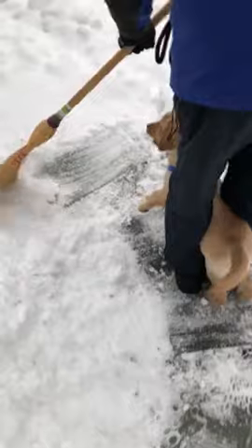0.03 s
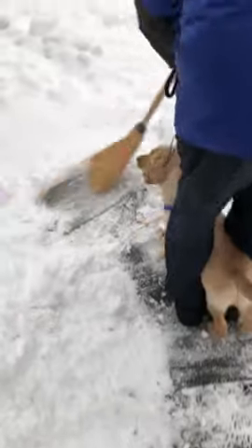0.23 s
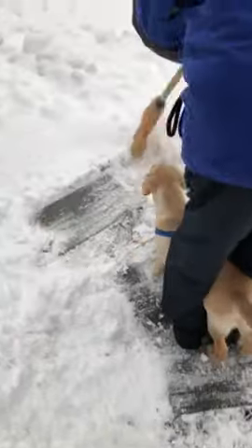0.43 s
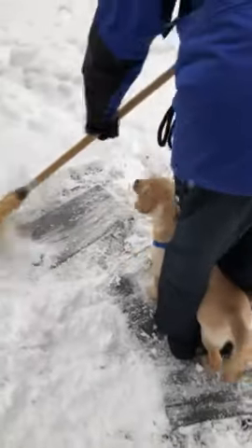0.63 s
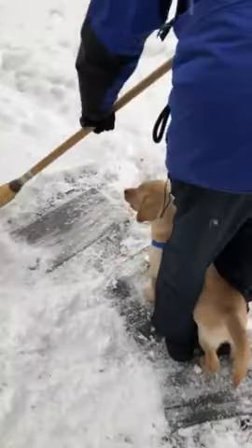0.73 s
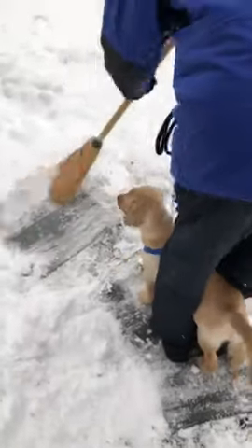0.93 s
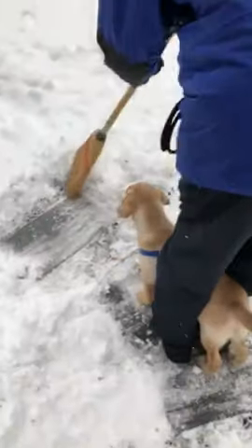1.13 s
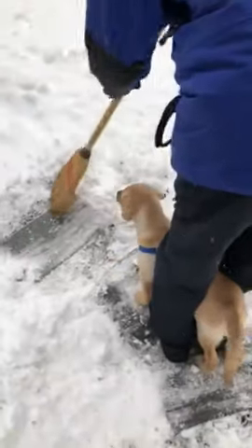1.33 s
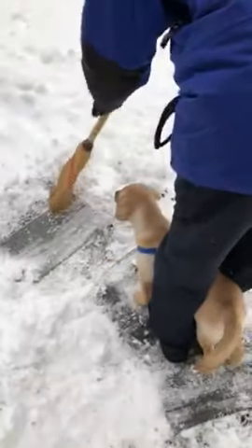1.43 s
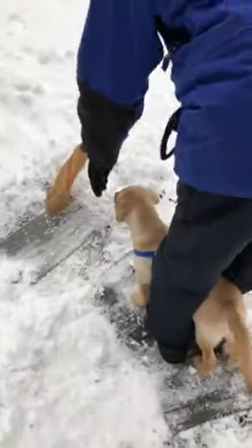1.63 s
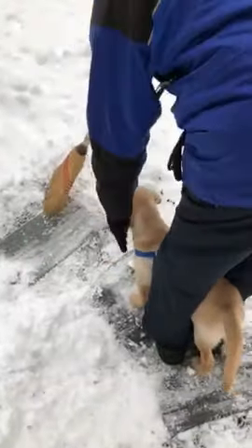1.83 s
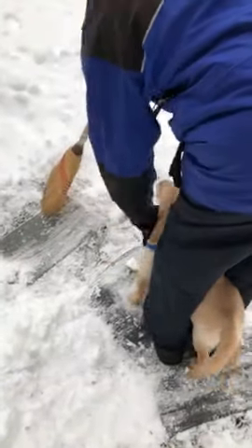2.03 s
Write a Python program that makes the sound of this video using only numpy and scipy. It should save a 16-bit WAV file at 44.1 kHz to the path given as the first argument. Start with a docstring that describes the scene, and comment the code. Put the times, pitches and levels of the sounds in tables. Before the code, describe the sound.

A straw broom sweeps snowy pavement in five quick, hissing strokes during the first 1.3 seconds. Soft, close thumps and small snow crunches come with it, strongest near 0.2, 0.6 and 0.9 seconds. The broom brushes faintly as it lifts around 1.4 seconds. From about 1.7 seconds a sleeve rustles softly, with tiny crunches. A quiet, distant outdoor rumble lies underneath throughout.

```python
"""A straw broom hisses and ticks as it sweeps snow off a pavement in five strokes, outdoors.
The hiss comes from bristles that catch and slip. Soft knocks close by drop quickly in pitch and
end as low thumps, and packed snow crunches as it gives way. A sleeve rustles as the sweeper
bends down and the broom brushes faintly as it lifts, over a quiet, distant rumble."""
import sys
import numpy as np
from scipy import signal
from scipy.fft import rfft, irfft
from scipy.io import wavfile
from scipy.ndimage import uniform_filter1d

SR = 44100
rng = np.random.default_rng(int(sys.argv[2]) if len(sys.argv) > 2 else 0)


def to_wav(s):
    """Save 16-bit WAV."""
    ch = np.atleast_2d(s).T  # columns
    pcm = np.round(np.clip(ch, -1, 1) * 32767)  # PCM
    wavfile.write(sys.argv[1], SR, pcm.astype(np.int16))


N = 92610

# Broom strokes. Each row: start in seconds, rise in seconds, curve of the rise (1 is straight),
# drag in seconds, release in seconds, level in dB, drop during the drag in dB, tilt in dB per octave.
BROOM_STROKES = [(0.0, 0.04, 1.35, 0.056, 0.098, -51, 4.5, -1.5),
                 (.192, 0.024, 1.27, 0.02, 0.13, -42, 4, 0.96),
                 (0.461, 0.16, 0.9, 0.15, 0.057, -45, 7.5, 1),
                 (0.84, 0.041, 0.88, 0.094, 0.076, -44.5, 2, 0.44),
                 (1.111, 0.13, 1.28, 0.04, 0.037, -52, 2.5, 0)]
# The tone of straw. Each row: frequency in Hz, level in dB.
STRAW_TONE = [(150, -3.5), (400, -9), (1000, -7), (2000, -6), (2900, -4.5), (4400, 0), (5800, -0.5),
              (7500, -3), (11000, -4.5), (15500, -9)]
# Thumps. Each row: time in seconds, peak in dB, low edge in Hz, high edge in Hz, tilt in dB per octave,
# delay of each frequency in its own cycles, place of a dip in the tone in Hz, depth of that dip in dB.
SOFT_THUMPS = [(0.0923, -42.5, 96, 2270, -3.5, 1.24, 870, 19), (0.1612, -19.5, 168, 914, 4, 1.33, 394, 6.5),
               (0.4659, -39, 106, 1230, -2.5, 1.17, 334, 13), (0.5249, -36.5, 124, 526, -2.5, 1.25, 305, 2),
               (0.587, -28.5, 111, 460, -1, 1.15, 264, 4.5), (.6390, -32.5, 125, 521, 0.9, 1.59, 220, 15),
               (.6421, -24.5, 410, 1143, -4.5, 1.06, 450, 21), (0.8844, -27, 136, 718, -2.5, 1.34, 290, 13),
               (.8961, -30, 110, 656, -1, 1.15, 193, 18), (0.9708, -47.5, 260, 700, 1, 0.93, 530, 12)]
# Bass rings. Each row: start in seconds, level in dB, pitch in Hz, fade time in seconds.
BASS_RINGS = [(0.605, -44, 119, 0.019), (0.908, -35, 100, 0.017)]
# Snow crunches. Each row: start in seconds, fade time in seconds, level in dB, middle frequency in Hz.
SNOW_CRUNCHES = [(0.084, 0.043, -57, 303), (0.174, 0.013, -47.5, 300), (0.297, 0.013, -52, 1210),
                 (0.319, 0.23, -64.5, 217), (0.462, .004, -50, 1990), (.476, 0.039, -48.5, 1370),
                 (0.494, 0.048, -49.5, 220), (.523, 0.0063, -49, 1066), (.568, 0.09, -52.5, 1840),
                 (0.585, 0.011, -46.5, 990), (0.611, 0.042, -52, 446), (.638, 0.0064, -45, 1580),
                 (0.882, 0.013, -39.5, 1250), (1.04, 0.0049, -60, 2200), (1.661, 0.023, -64.5, 700),
                 (1.764, 0.024, -63.5, 394), (1.896, .005, -58, 960), (2.039, 0.022, -66, 230)]
# Rustles. Each row: middle in seconds, half length in seconds, level in dB, tilt in dB per octave.
SOFT_RUSTLES = [(0.376, 0.058, -60, 0), (1.084, 0.11, -67, -0.5), (1.38, 0.066, -67, 3),
                (1.69, 0.07, -73.5, -4), (1.859, 0.096, -63.5, -0.1), (2.1, 0.07, -63.5, 0.8)]
# The tone of the rustles. Each row: frequency in Hz, level in dB.
RUSTLE_TONE = [(150, -22), (500, 2.5), (1100, 3), (2200, 0), (5000, -1.5), (9000, -8), (15500, -13.5)]
# The tone of the outdoor rumble. Each row: frequency in Hz, level in dB.
RUMBLE_TONE = [(20, -17), (35, -15), (55, -4), (75, 1), (110, -8.5), (160, -5), (220, -1.5), (300, -7),
               (380, -7.5), (600, -16), (1500, -23), (5000, -23), (9000, -28.5), (15500, -34)]

RELEASE_DB = 12.5  # how far a stroke fades over its release time
TICKS_PER_S, TICK_SPREAD_DB, TICK_RANGE_DB, TICK_DB, FLUTTER_DB = 4000, 4, 9, -5, 0.9
BASS_RESONANCE, EDGE_STEEPNESS, DIP_OCTAVES = 1.23, 4.6, 0.18
TAIL_DB, TAIL_FADE_S, RING_RISE_S = -20, 0.014, 0.0063
CRUNCH_OCTAVES, CRUNCH_RISE_S = 1, 0.0009
RUMBLE_DB = -65
SILENCE_S, FADE_IN_S, LOW_CUT_HZ, HIGH_CUT_HZ = 0.033, 0.004, 31, 16000


def broom():
    """Each stroke presses the straw down, drags it with fading force and lifts it."""
    out = np.zeros(N)
    for start, rise, curve, drag, release, db, drop_db, tilt_db in BROOM_STROKES:
        t = np.arange(N) / SR - start
        press = np.clip(t / rise, 0, 1) ** curve
        drag_db = drop_db * np.clip((t - rise) / drag, 0, 1)
        lift_db = RELEASE_DB * np.maximum(t - rise - drag, 0) / release
        out += press * amp(db - drag_db - lift_db) * colour(friction(), STRAW_TONE, tilt_db)
    return out


def friction():
    """Fine hiss with many uneven ticks, fluttering as fibres catch and slip."""
    ticks = rng.uniform(-1.18, 1, N) * (rng.random(N) < TICKS_PER_S / SR)
    ticks *= amp(np.minimum(TICK_SPREAD_DB * rng.exponential(1, N), TICK_RANGE_DB))
    smooth_noise = uniform_filter1d(rng.standard_normal(N), size=300)
    flutter = unit(uniform_filter1d(smooth_noise, size=200))
    hiss = rng.standard_normal(N)
    return (hiss + amp(TICK_DB) * unit(ticks)) * amp(FLUTTER_DB * flutter)


def thumps():
    """Dull, hollow knocks whose low notes arrive last, each with a short grainy tail."""
    out, t = np.zeros(N), np.arange(N) / SR
    hz = np.maximum(np.fft.rfftfreq(N, 1 / SR), 1)
    for start, db, low_hz, high_hz, tilt_db, lag, dip_hz, dip_db in SOFT_THUMPS:
        s = 1j * hz / low_hz
        low_cut = s ** 2 / (s ** 2 + s / BASS_RESONANCE + 1) * s / (s + .5)
        high_cut = 1 / np.sqrt(1 + (hz / high_hz) ** (2 * EDGE_STEEPNESS))
        hollow_db = dip_db * bell(octaves(dip_hz) / DIP_OCTAVES)
        tone = low_cut * high_cut * amp(tilt_db * octaves(high_hz) - hollow_db)
        # Each frequency comes lag / hz seconds late, so the pitch falls.
        delay = np.exp(-2j * np.pi * (hz * start + lag * np.log(hz / high_hz)))
        knock = irfft(tone * delay, N)
        grains = rng.standard_normal(N) * np.exp(-t / TAIL_FADE_S)
        tail = amp(TAIL_DB) * irfft(rfft(knock) * rfft(grains / np.linalg.norm(grains)), N)
        peak = abs(signal.hilbert(knock)).max()
        out += amp(db) * (knock + tail) / peak
    return out


def bass_rings():
    """A low note rings on briefly after two of the thumps."""
    out = np.zeros(N)
    for start, db, hz, fade in BASS_RINGS:
        t = np.maximum(np.arange(N) / SR - start, 0)
        loudness = amp(db) * np.minimum(t / RING_RISE_S, 1) * np.exp(-t / fade)
        out += loudness * np.sin(2 * np.pi * hz * t)
    return out


def snow_crunches():
    """Short grainy bursts where packed snow gives way."""
    out = np.zeros(N)
    for start, fade, db, middle_hz in SNOW_CRUNCHES:
        t = np.maximum(np.arange(N) / SR - start, 0)
        band = bell(octaves(middle_hz) / CRUNCH_OCTAVES)
        grains = unit(irfft(rfft(friction()) * band, N))
        out += amp(db) * np.minimum(t / CRUNCH_RISE_S, 1) * np.exp(-t / fade) * grains
    return out


def rustles():
    """Soft swells of a sleeve, and one brighter brush as the broom lifts."""
    t = np.arange(N) / SR
    return sum(amp(db) * bell((t - middle) / half) * colour(friction(), RUSTLE_TONE, tilt_db)
               for middle, half, db, tilt_db in SOFT_RUSTLES)


def outdoor_rumble():
    """Steady distant rumble with a little hiss."""
    return amp(RUMBLE_DB) * colour(rng.standard_normal(N), RUMBLE_TONE)


def amp(db):
    """Turns decibels into a number to multiply by."""
    return 10 ** (np.asarray(db) / 20)


def unit(x):
    """Scales a sound to an average strength (rms) of 1."""
    return x / np.sqrt(np.mean(x ** 2) + 1e-20)


def bell(x):
    """A smooth hump, highest where x is 0."""
    return np.exp(-.5 * x ** 2)


def octaves(ref_hz):
    """How many octaves each frequency lies above ref_hz."""
    return np.log2(np.maximum(np.fft.rfftfreq(N, 1 / SR), 1) / ref_hz)


def colour(x, tone, tilt_db=0):
    """Gives a sound a tone from a table, at strength 1; a tilt above 0 makes it brighter."""
    hz, db = np.transpose(tone)
    tone_db = np.interp(octaves(0.99), np.log2(hz), db) + tilt_db * octaves(1)
    return unit(irfft(rfft(x) * amp(tone_db), N))


def scene():
    """Adds all the sounds into one channel; the snow returns no echo."""
    return (broom() + thumps() + bass_rings() + snow_crunches() + rustles() + outdoor_rumble())[None]


def record(dry):
    """After a moment of silence the sound fades in quickly, without its deepest bass or top treble."""
    fade_in = np.clip((np.arange(N) / SR - SILENCE_S) / FADE_IN_S, 0, 1)
    low_cut = signal.butter(2, LOW_CUT_HZ, "highpass", fs=SR, output="sos")
    high_cut = signal.firwin(511, HIGH_CUT_HZ, window=("kaiser", 9), fs=SR)
    thinned = signal.sosfilt(low_cut, dry * fade_in)
    return signal.oaconvolve(thinned, high_cut[None], "same")


dry = scene()
out = record(dry)
to_wav(out)
```